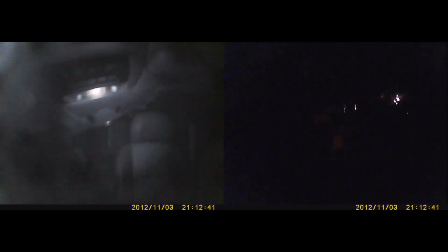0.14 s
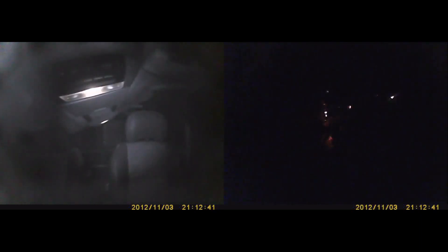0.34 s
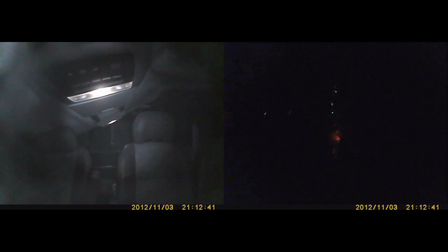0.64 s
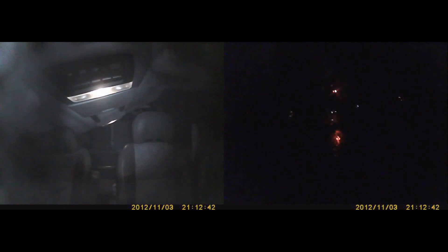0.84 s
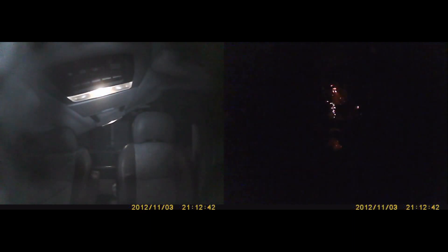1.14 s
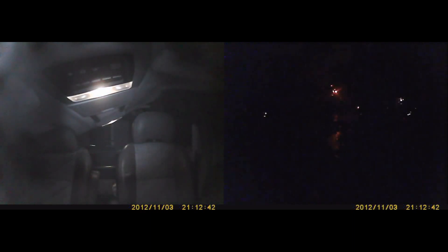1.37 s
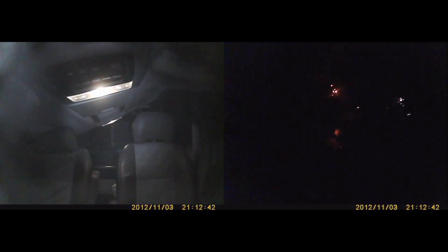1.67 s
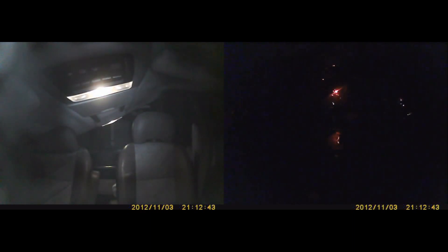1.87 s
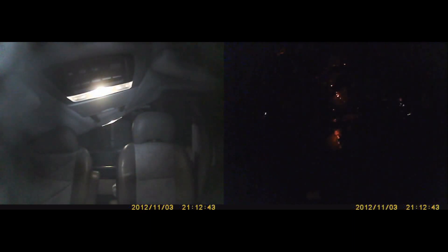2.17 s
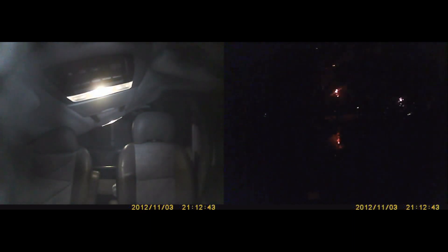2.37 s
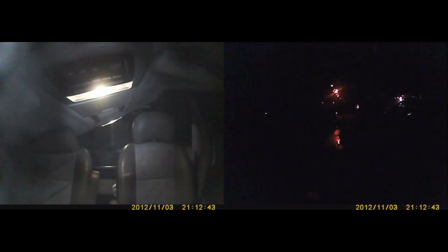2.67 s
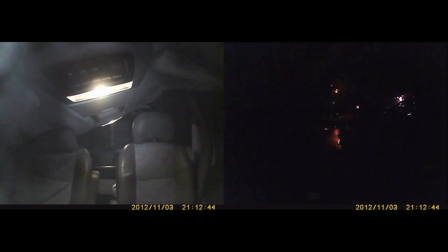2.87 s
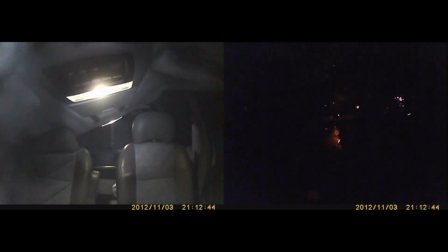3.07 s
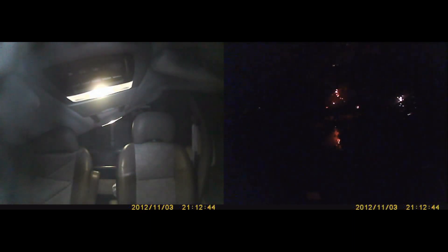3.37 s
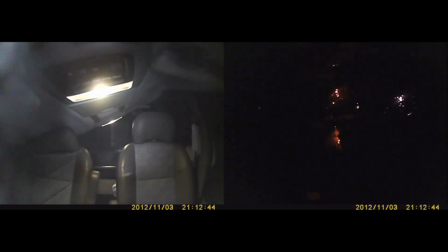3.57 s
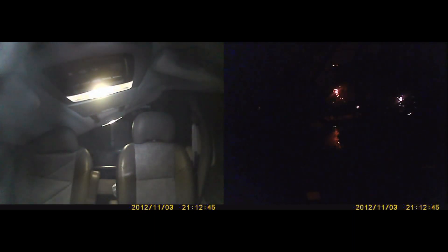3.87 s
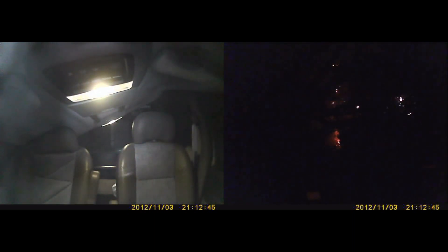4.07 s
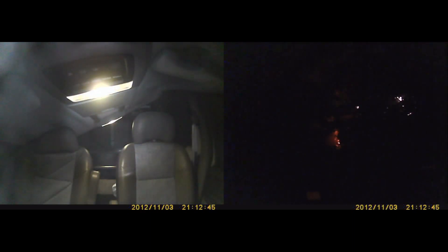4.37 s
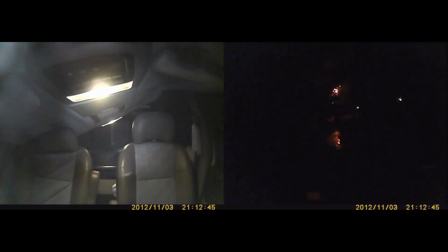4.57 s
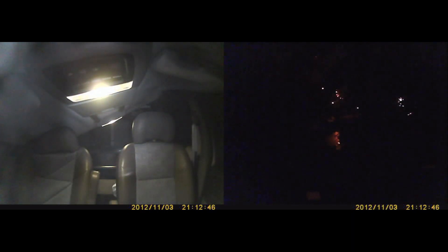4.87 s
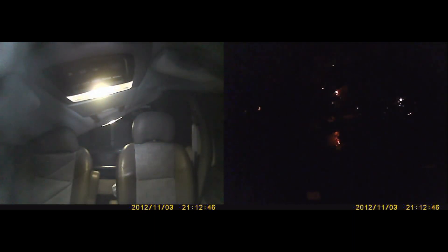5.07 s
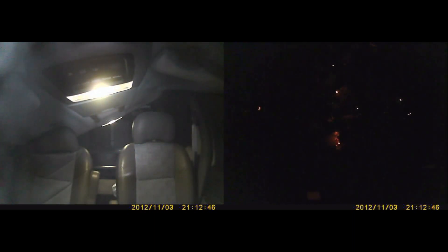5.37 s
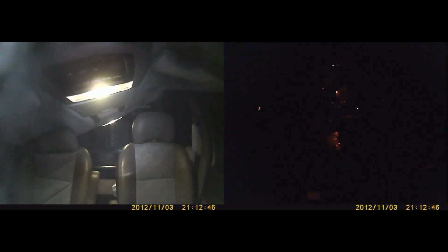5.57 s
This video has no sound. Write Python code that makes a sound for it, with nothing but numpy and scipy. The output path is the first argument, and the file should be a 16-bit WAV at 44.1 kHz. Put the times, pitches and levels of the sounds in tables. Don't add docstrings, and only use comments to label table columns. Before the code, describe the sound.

A violent, overloaded crash and splintering roar slams a van roof from inside, then branches and debris knock and tick over dull storm wash.

```python
import sys
import numpy as np
from scipy import signal
from scipy.io import wavfile
from scipy.ndimage import uniform_filter1d

SR = 44100
rng = np.random.default_rng(int(sys.argv[2]) if len(sys.argv) > 2 else 0)


def generate_wav(sig):
    pcm = np.round(np.clip(np.atleast_2d(sig).T, -1, 1) * 32767).astype(np.int16)
    wavfile.write(sys.argv[1], SR, pcm)


def invert_db(x):
    u = np.asarray(x, float) / 20
    return 10 ** u


N = 252693
T = np.arange(N) / SR

# start_s, shaking_db, air_pressure [amplifier bias, full scale]
CRASH = [
    (.055, -60, .58),
    (.085, -50, .45),
    (.208, -30, .5),
    (.217, -3, .7),
    (.36, -3.5, .4),
    (.58, -6.5, .15),
    (.635, -4.5, .42),
    (.7, -7.5, .08),
    (.76, -14.5, 0),
]
# shaking_db, splintering_db, cabin_rumble_db
FOLLOW = [(-62, -82, -73), (-38.5, -65.5, -62), (-30, -54, -34.5), (-29, -53, -32), (-16.5, -35.5, -33.5),
          (-16.5, -34, -24), (1, -24.5, -31.5)]


def evened(x):
    return x / np.sqrt(np.mean(x ** 2) + 1e-20)


def add(mix, s, sound):
    part = mix[max(round(s * SR), 0):][:len(sound)]
    part += sound[:len(part)]


def resonate(x, hz, width):
    return signal.lfilter(*signal.iirpeak(hz, hz / width, SR), x)


def slow(hz):
    lowpass = signal.butter(2, hz, fs=SR, output="sos")
    return evened(signal.sosfiltfilt(lowpass, rng.standard_normal(N)))


def noise(spectrum, patchy_db, size=512):
    frames = 4 * N // size + 5
    hz = np.fft.rfftfreq(size, 1 / SR)
    a, b, patches = rng.standard_normal((frames, len(hz), 3)).T
    patches = uniform_filter1d(patches, 4, axis=0)
    patches = evened(uniform_filter1d(patches, 10, axis=1))
    f, db = np.transpose(spectrum)
    shape_db = np.interp(np.log(hz + 1), np.log(f + 1), db, left=-120, right=-120)
    z = (a + 1j * b) * invert_db(shape_db[:, None] + patchy_db * patches)
    return evened(signal.istft(z, nperseg=size, noverlap=3 * size // 4)[1][:N])


def shaking():
    # start_s, shaking_db
    settling = [(.85, -10.5), (.95, -16.5), (1.036, -16), (1.06, -19), (1.27, -26), (1.358, -22.5),
                (1.54, -28), (1.67, -28), (1.87, -32.5), (2.069, -33), (2.23, -26.5), (2.441, -35),
                (3.17, -38.5), (4.49, -41), (4.88, -39.5), (5.73, -41.5)]
    s, db = np.transpose([row[:2] for row in CRASH] + settling)
    return np.interp(T, s, db)


def shell_share(shake_db):
    return np.clip((shake_db + 38) / 12, 0, 1)


def crossfade(share, near, far):
    return np.sqrt(share) * near + np.sqrt(1 - share) * far


def squeeze():
    s, _, bias = np.transpose(CRASH)
    return np.interp(T, s, bias)


def shell():
    # pitch_hz, level_db [per Hz]
    roar_spectrum = [(35, -33), (60, 0.5), (182, -4.5), (279, 1), (350, -9), (446, -1.5), (610, -3.5),
                     (714, -3), (1430, -18), (1800, -70), (2340, -62.5), (3960, -120)]
    # pitch_hz, level_db [per Hz]
    wash_spectrum = [(35, -43), (60, -8.5), (145, -10), (225, -4), (336, -10.5), (446, -6), (529, -13.5),
                     (610, -8), (1800, -37), (2340, -59), (3960, -120)]
    shake_db = shaking()
    metal = noise(roar_spectrum, patchy_db=1.5, size=1024)
    wash = noise(wash_spectrum, patchy_db=1.5, size=1024)
    roar = crossfade(shell_share(shake_db), metal, wash)
    roar = evened(roar * invert_db(1.2 * slow(25)))
    groan = evened(resonate(roar, 340, 150))
    roar += .5 * np.clip(3 * squeeze(), 0, 1) * groan
    return invert_db(shake_db) * roar


def splintering():
    # pitch_hz, level_db
    wood_spectrum = [(900, -1.5), (1500, -3.5), (2300, -2.5), (3500, -3), (4000, -11), (4450, 2),
                     (5000, -15), (10000, -19)]
    # pitch_hz, level_db
    rain_spectrum = [(900, -30), (1500, -12), (2300, -4), (3500, -3.5), (4150, -12.5), (4500, 0.5),
                     (4850, -13.5), (5500, -14), (8000, -30.5)]
    shake_db = shaking()
    law_db, splinter_db, _ = np.transpose(FOLLOW)
    strength = invert_db(1.13 * np.minimum(rng.exponential(1, N), 4))
    grains = strength * (rng.random(N) < 60 / SR)
    puff = invert_db(-60 * T[:3000] / 0.0082)
    lumps = signal.oaconvolve(grains, puff)[:N]
    wood = noise(wood_spectrum, patchy_db=3.0)
    rain = noise(rain_spectrum, patchy_db=3.5)
    hiss = crossfade(shell_share(shake_db), wood, rain)
    return invert_db(np.interp(shake_db, law_db, splinter_db)) * evened(hiss * (1 + 1.7 * lumps))


def pressure():
    # start_s, length_s, push [full scale]
    surges = [
        (.2245, .006, 3.1),
        (.2335, .004, 3.1),
        (.315, .0165, 3.1),
        (.378, .006, 3.1),
        (.385, .005, 3.1),
        (.4, .0185, 5.5),
        (1.473, .026, .5),
    ]
    # start_s, depth [full scale]
    cracks = [(0.017, 0.16), (0.0396, 0.12), (0.064, 0.2), (0.0765, 1.26), (0.0807, 1.7), (0.1059, 1.4),
              (0.107, 0.94), (0.112, 2), (0.1191, 1.1), (0.1212, 0.96), (0.1226, 1.2), (0.1394, 1.1),
              (0.1439, 3.2), (0.1451, 1.1), (0.164, 0.26), (0.1685, 1.3), (0.1726, 0.38), (0.1759, 5.9),
              (0.179, 4.1), (0.1833, 0.27), (0.1854, 0.93), (0.195, 0.5), (0.195, 1.1), (0.1977, 1),
              (0.2017, 1.3), (0.2062, 0.53), (0.2124, 0.96), (0.2152, 0.82)]
    out = squeeze()
    for s, length, push in surges:
        add(out, s, push * signal.windows.tukey(round(length * SR), .15))
    for s, depth in cracks:
        width_ms = 0.35 * depth ** 0.36
        spike = np.exp(-(2200.0 * (T - s) / width_ms) ** 2 * np.log(2))
        out -= (depth + 0.02 + 3.7 * max(depth - .88, 0)) * spike
    return out


def hits():
    # start_s, tick_peak_db, panel_knock_db, panel_pitch_hz, knock_t60_s
    branches = [(0.8081, -27, -5, 725, 0.14), (0.855, -10, -4.5, 407, 0.12),
                (0.9141, -9.5, -5.5, 734, 0.13), (0.9714, -23, -11.5, 437, .076),
                (1.0175, -41, 0.5, 460, 0.047), (1.282, -15, -7.5, 680, 0.064),
                (1.4712, -17.5, 1, 774, 0.11), (2.059, -29, -10, 1124, 0.14),
                (2.0717, -17, 0.5, 936, 0.042), (2.1, -32, -11, 496, 0.22),
                (2.174, -32.5, -20.5, 475, 0.21), (3.3541, -18, -18.5, 437, 0.076),
                (3.6606, -13, -9.5, 707, 0.059)]
    # start_s, tick_peak_db, panel_knock_db, panel_pitch_hz
    shards = [(1.129, -36, -19.5, 810), (1.177, -26.5, -15.5, 694), (1.253, -31, -35, 464),
              (1.3294, -27.5, -42, 708), (1.4421, -22.5, -15.5, 560), (1.6287, -36, -16.5, 300),
              (1.6864, -50, -25, 430), (1.787, -49, -26.5, 266), (1.8492, -34.5, -27.5, 262),
              (1.8692, -29.5, -23.5, 1070), (1.9096, -33, -19.5, 1084), (2.1393, -31, -15.5, 270),
              (2.2244, -37, -23, 484), (2.2548, -29, -37, 246), (2.3015, -21, -21, 950),
              (2.3294, -46, -16.5, 604), (2.3614, -49, -23.5, 573), (2.4314, -46, -37, 640),
              (2.4658, -43, -29, 970), (2.4848, -27, -19, 440), (2.576, -31, -31, 205),
              (2.6811, -22, -16.5, 437), (2.7123, -55, -18.5, 900), (2.7726, -23.5, -22.5, 870)]
    # start_s, tick_peak_db, panel_knock_db, panel_pitch_hz
    twigs = [(2.9066, -52, -31.5, 202), (3.1619, -32.5, -34, 1120), (3.537, -26, -23.5, 597),
             (3.6292, -29, -34, 431), (3.774, -51, -39, 238), (4.0746, -48, -36, 940),
             (4.2654, -43, -36.5, 900), (4.3087, -35, -31.5, 785), (4.4172, -36, -31, 980),
             (4.5391, -29, -22.5, 870), (4.6452, -39.5, -32.5, 790), (4.8217, -45.5, -30, 740),
             (5.1103, -22, -23, 730), (5.2073, -49, -36, 1000), (5.4247, -31.5, -29.5, 885)]
    # pitch_hz, width_hz, level_db
    tick_modes = [(1280, 100, 17.5), (2675, 990, 13), (3430, 270, 8.5), (4324, 53, 6.5), (5400, 500, -42),
                  (7600, 3000, -29)]
    # pitch_hz, width_hz, level_db
    air_modes = [(123, 48, 6.5), (261, 55, 6.5), (438, 110, 6.5), (599.5, 74, 4), (1000, 67, 6.5)]
    shard_t60_s, twig_t60_s, tick_t60_s = 0.054, 0.057, 0.055
    out, t = np.zeros(N), T[:8000]
    rows = branches + [(*row, shard_t60_s) for row in shards] + [(*row, twig_t60_s) for row in twigs]
    for s, tick_db, knock_db, hz, knock_t60 in rows:
        a, b = rng.standard_normal((2, len(t)))
        crack = a * (invert_db(-60 * t / tick_t60_s) + 2.1 * np.exp(-t / 0.00039))
        tick = sum(invert_db(db) * resonate(crack, f, w) * np.sqrt(300 / w) for f, w, db in tick_modes)
        far = tick_db < -27 and s > twigs[0][0]
        tick = signal.lfilter(*signal.butter(3, 5000 if far else 7500, fs=SR), tick)
        swell = 1 - np.exp(-t / 0.0029) + 0.64 * np.exp(-t / 0.00096)
        blow = b * invert_db(-60 * t / knock_t60) * swell
        panel = resonate(resonate(blow, hz, 190), hz, 350)
        air = sum(invert_db(db) * resonate(resonate(blow, f, w), f, 3 * w) for f, w, db in air_modes)
        knock = evened(panel) + 0.78 * evened(air)
        add(out, s, invert_db(tick_db) * tick / abs(tick).max() + invert_db(knock_db + 0.5) * knock / abs(knock).max())
    return out


def knocks():
    # start_s, peak_db, pitch_hz, t60_s
    panel_knocks = [(1.282, -11.5, 696, 0.052), (1.684, -19, 210, 0.078), (2.113, -16, 212, 0.07),
                    (2.115, -19, 523, 0.16), (2.154, -31, 260, 0.088), (2.199, -22.5, 486, 0.051),
                    (2.24, -32, 447, 0.072), (2.304, -17.5, 996, 0.097), (2.36, -21.5, 602, 0.16),
                    (2.501, -17, 280, 0.063), (2.513, -16, 227, 0.064), (2.684, -48, 410, 0.077),
                    (2.716, -32, 1010, 0.041), (2.804, -10.5, 604, 0.029), (2.815, -18.5, 622, 0.084),
                    (3.025, -32, 286, 0.087), (4.075, -24.5, 1030, 0.071), (4.807, -30, 993, 0.1),
                    (5.206, -35.5, 275, 0.3), (5.529, -29.5, 560, 0.1), (1.471, 7, 454, 0.12),
                    (2.157, -19.5, 1000, 0.052), (3.025, -27.5, 1000, 0.036), (3.355, -14.5, 995, 0.042),
                    (3.356, -18.5, 728, 0.098), (3.661, -7, 596, 0.08), (3.661, -6, 1292, 0.028),
                    (1.503, -8, 289.5, 0.09), (1.49, -8.5, 897, 0.08), (0.63, -3, 371.3, 0.17)]
    slide_per_s = -1.57
    out, t = np.zeros(N), T[:8000]
    for s, db, hz, t60 in panel_knocks:
        detune, phase = rng.random(2)
        turn = 2 * np.pi * hz * (t + slide_per_s * t ** 2 / 2)
        ring = np.sin(turn) + .35 * np.sin(turn * (1.07 + .14 * detune) + 2 * np.pi * phase)
        ring *= invert_db(-60 * t / t60) * (1 - np.exp(-t / 0.0021))
        add(out, s, invert_db(db - 4.0) * ring / abs(ring).max())
    return out


def heaves():
    # start_s, push_db
    blows = [
        (1.282, -12),
        (1.473, -22),
        (2.072, -24),
        (3.665, -13),
    ]
    out, u = np.zeros(N), T[:8000] / 0.0023
    shove = np.e * (u * np.exp(-u) - u / 25 * np.exp(-u / 5))
    for s, db in blows:
        add(out, s, invert_db(db) * shove)
    return out


def rumble():
    # start_s, buffeting_db
    gusts = [
        (2.44, -53),
        (3.02, -45),
        (3.44, -54),
        (3.6, -54),
        (4.08, -52),
        (4.88, -50),
        (5.12, -47),
        (5.36, -40.5),
        (5.73, -47.5),
    ]
    law_db, _, rumble_db = np.transpose(FOLLOW)
    shaken = invert_db(np.interp(shaking(), law_db, rumble_db))
    wind = invert_db(np.interp(T, *np.transpose(gusts)))
    low = noise([(14, -12.0), (24, 8.5), (45, 2), (60, -12), (110, -10)], patchy_db=1.5, size=4096)
    return np.hypot(shaken, wind) * low


def scene():
    mono = shell() + splintering() + pressure() + hits() + knocks() + heaves() + rumble()
    return np.tile(mono, (2, 1))


def upper_limit():
    start, low, end = .52, .39, .47
    drop_s, drop_length_s, creep_s = .055, .03, .3
    creep = end - (end - low) * np.exp(-(T - drop_s) / creep_s)
    fall = start - (start - low) * np.clip((T - drop_s) / drop_length_s, 0, 1)
    return np.maximum(creep, fall)


def amplifier(x):
    return np.clip(x, -0.5 - .16 * squeeze(), upper_limit())


def gate(x, masking):
    # pitch_hz, level_db
    threshold = [(3000, -125), (3600, -105), (3800, -97), (4600, -97), (5200, -98), (8000, -101),
                 (10500, -97)]
    hz, _, z = signal.stft(x, SR, nperseg=2048, boundary="even")
    power = abs(z) ** 2
    loud_db = 10 * np.log10(power[:, 5:].sum(1, keepdims=True) + 1e-12)
    threshold_db = np.interp(hz, *np.transpose(threshold))[:, None]
    edge = invert_db(threshold_db + masking * np.maximum(loud_db + 20.5, 0)) ** 2
    edge, lines = edge[:, :1024], power[:, :1024]
    bands = lines.reshape(2, 64, 16, -1).mean(2).repeat(16, 1)
    z[:, :1024] *= (bands > 2.5 * edge) | (lines > 4 * edge)
    return signal.istft(z, SR, nperseg=2048)[1][:, :x.shape[1]]


def top_cut(x):
    return signal.sosfilt(signal.butter(12, 10380, fs=SR, output="sos"), x)


def record(dry):
    clipped = amplifier(dry[0])
    sag = .3 * (uniform_filter1d(clipped, 900) - uniform_filter1d(clipped, 4000))
    treble = clipped - uniform_filter1d(clipped, 12)
    block = signal.windows.tukey(3900, .4) / 3100
    spread = np.sqrt(signal.oaconvolve(treble ** 2, block, "same").clip(0))
    smear_spectrum = [(1500, -20), (2500, 0), (5000, -5), (7000, -10), (10000, -16)]
    smear = invert_db(-17) * spread * noise(smear_spectrum, patchy_db=2.5)
    swing = (clipped - uniform_filter1d(clipped, 400)) ** 2
    swing = np.sqrt(abs(uniform_filter1d(swing, 1500)))
    fizz_spectrum = [(60, -4.5), (1000, 3), (2000, -2), (5000, -13), (10000, -17)]
    fizz = np.array([noise(fizz_spectrum, patchy_db=5.0) for _ in dry])
    fizz *= invert_db(-26.5) * swing * np.clip(swing / 0.19, 0, 1)
    fizzy = clipped - sag - .013 + smear + fizz
    padded = np.pad(fizzy, ((0, 0), (300, 300)), "edge")
    dulled = signal.lfilter(*signal.butter(1, 9000, fs=SR), padded)
    edge = signal.firwin(401, 10400, window=("kaiser", 9), fs=SR)[None]
    limited = signal.oaconvolve(dulled, edge, "same")[:, 300:-300]
    return top_cut(gate(limited, masking=0.033))


dry = scene()
out = record(dry)
generate_wav(out)
```